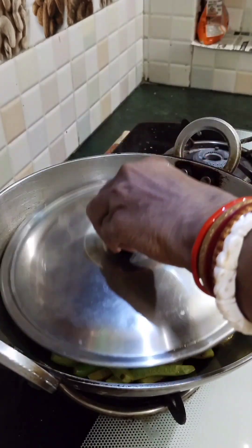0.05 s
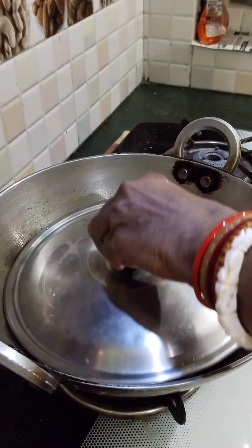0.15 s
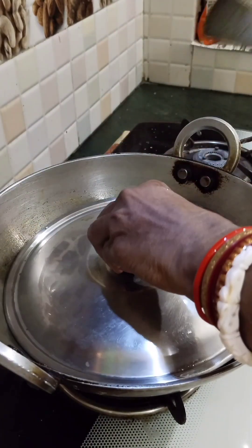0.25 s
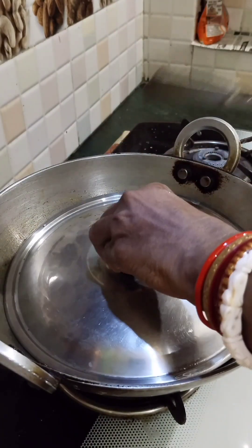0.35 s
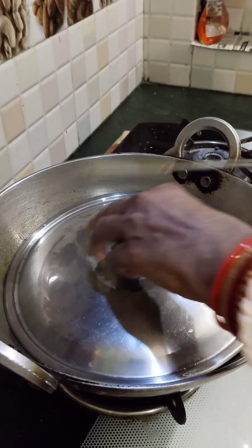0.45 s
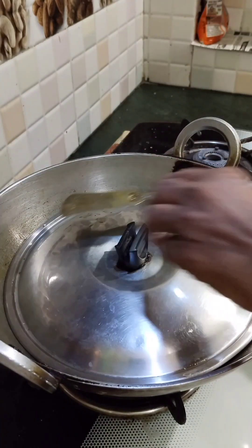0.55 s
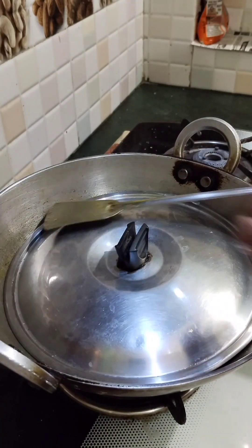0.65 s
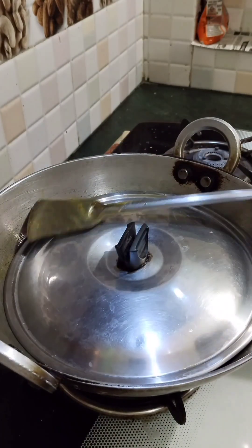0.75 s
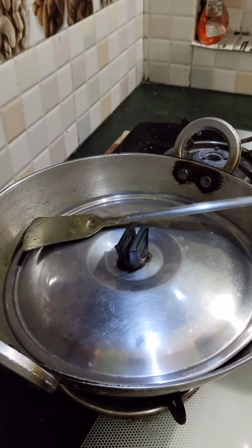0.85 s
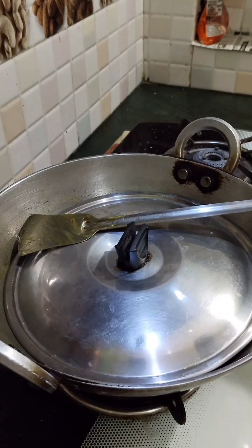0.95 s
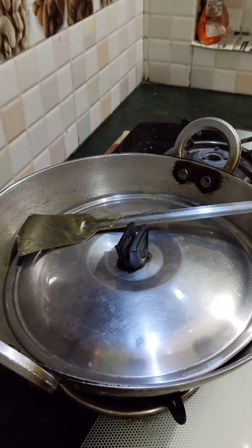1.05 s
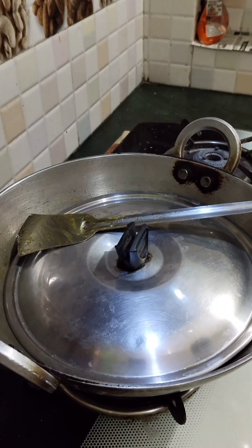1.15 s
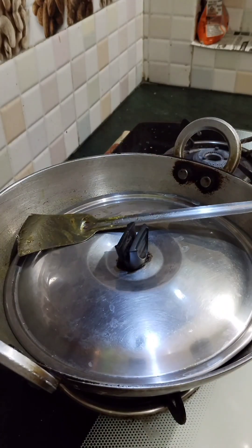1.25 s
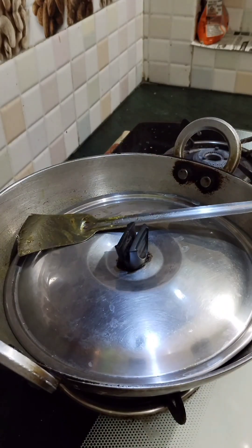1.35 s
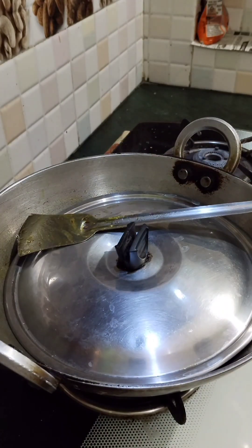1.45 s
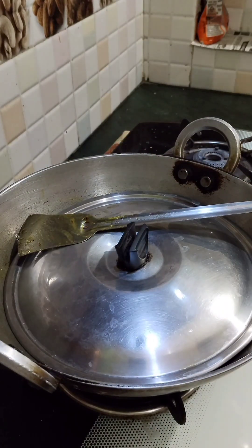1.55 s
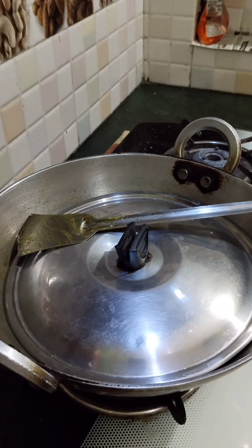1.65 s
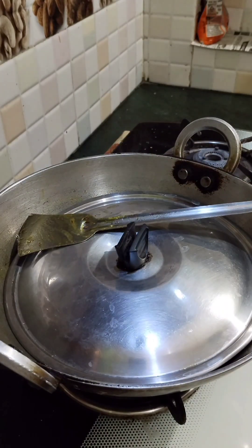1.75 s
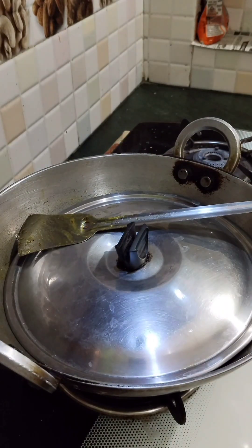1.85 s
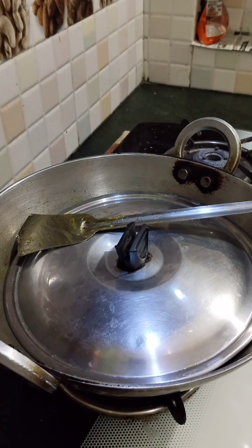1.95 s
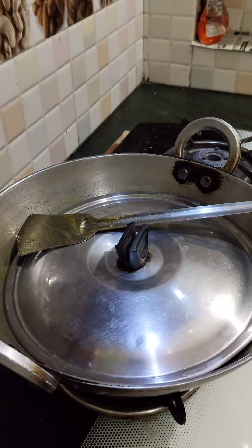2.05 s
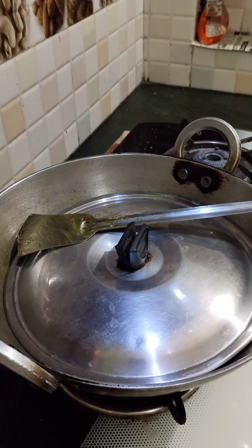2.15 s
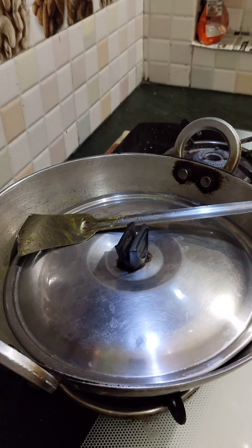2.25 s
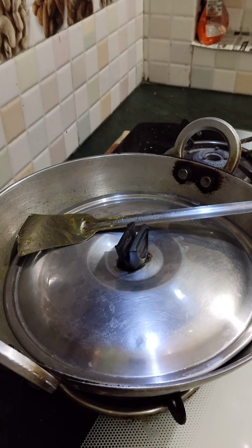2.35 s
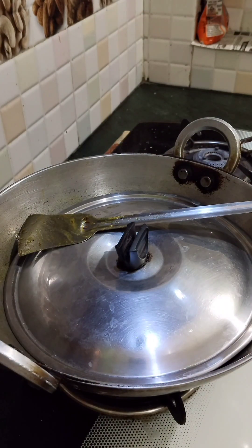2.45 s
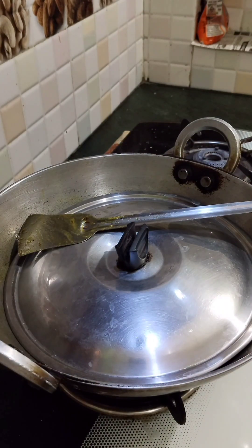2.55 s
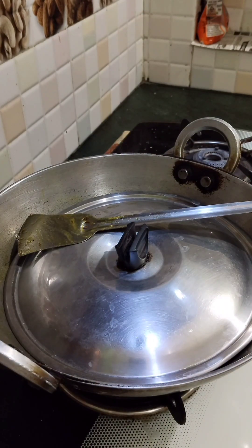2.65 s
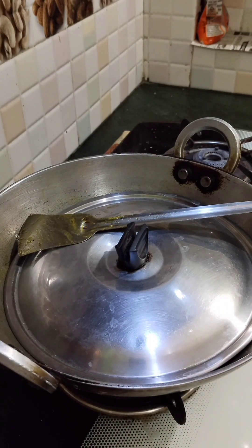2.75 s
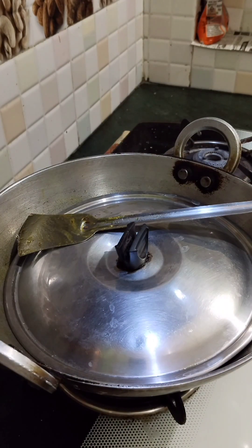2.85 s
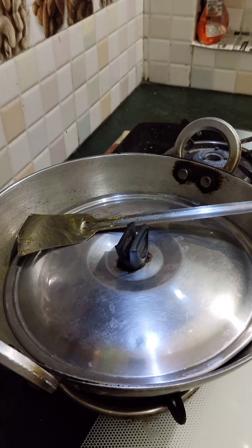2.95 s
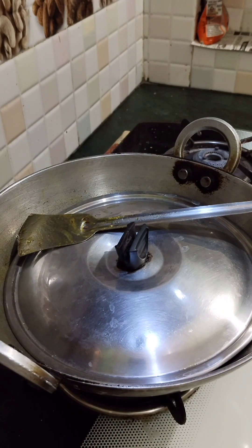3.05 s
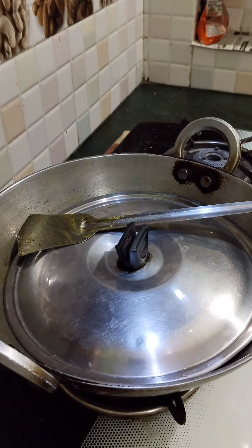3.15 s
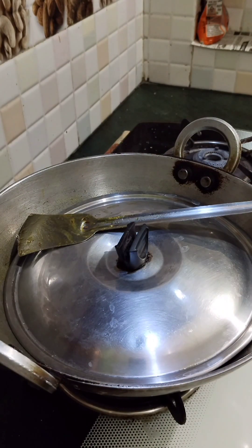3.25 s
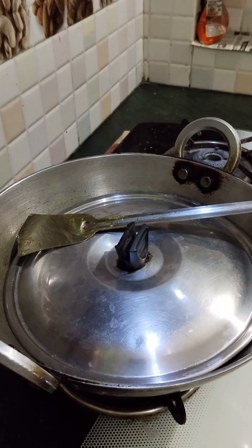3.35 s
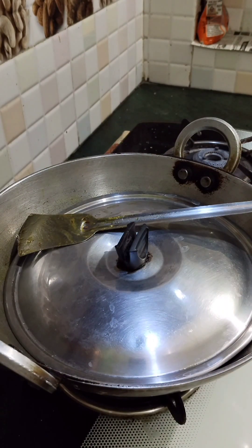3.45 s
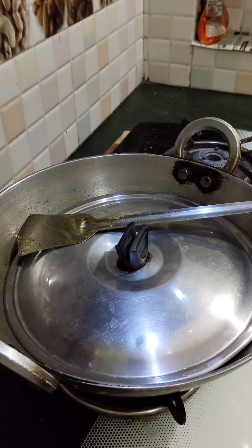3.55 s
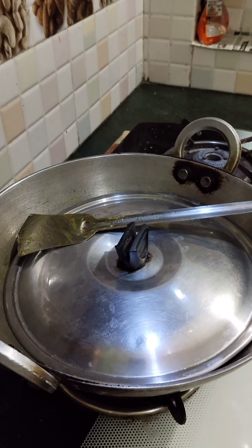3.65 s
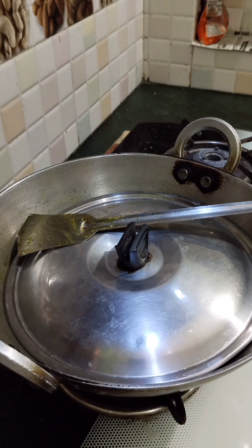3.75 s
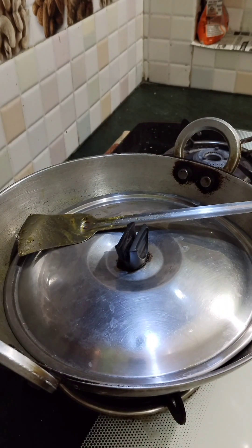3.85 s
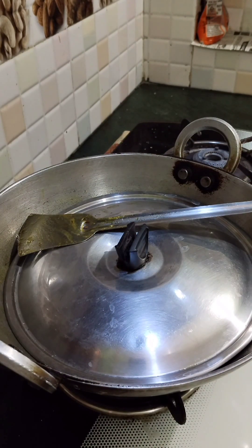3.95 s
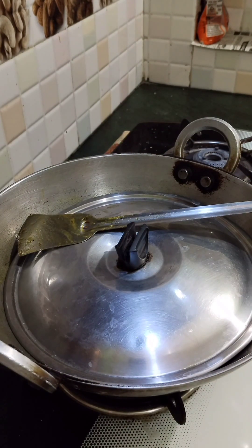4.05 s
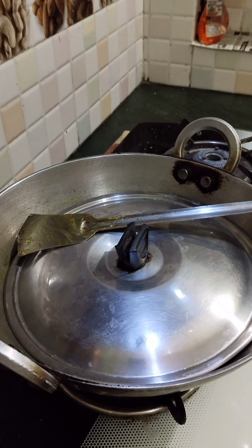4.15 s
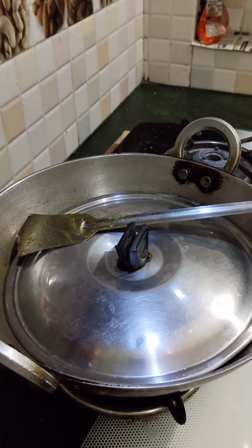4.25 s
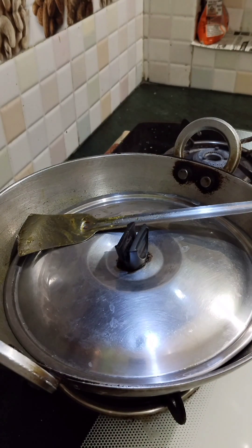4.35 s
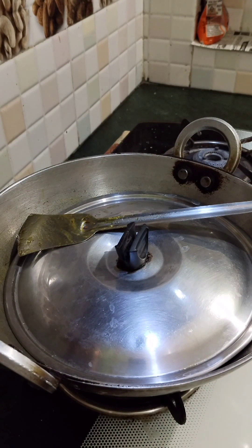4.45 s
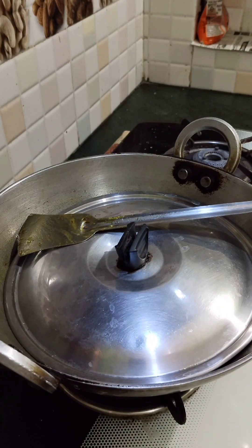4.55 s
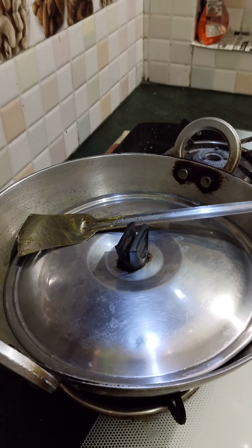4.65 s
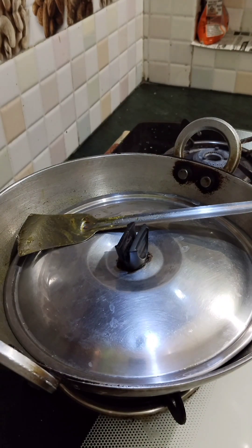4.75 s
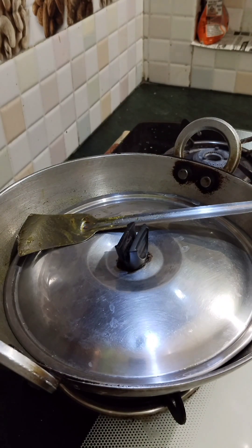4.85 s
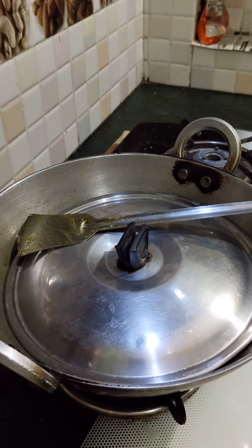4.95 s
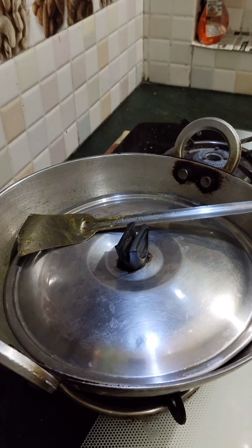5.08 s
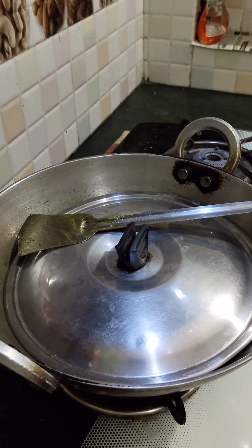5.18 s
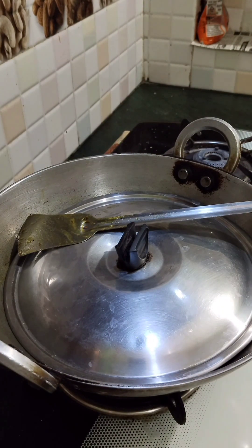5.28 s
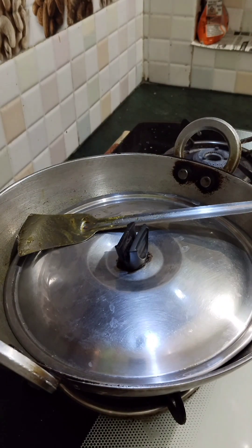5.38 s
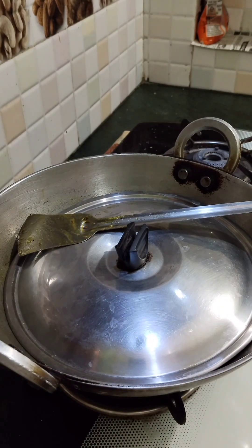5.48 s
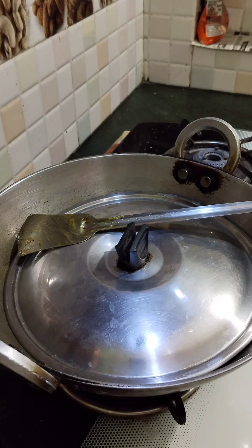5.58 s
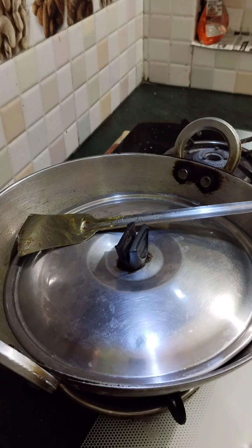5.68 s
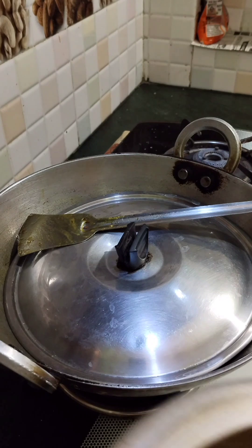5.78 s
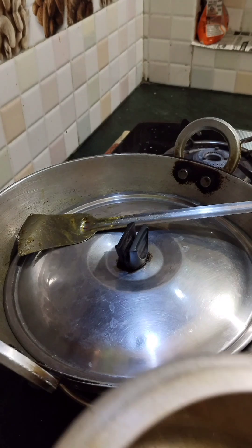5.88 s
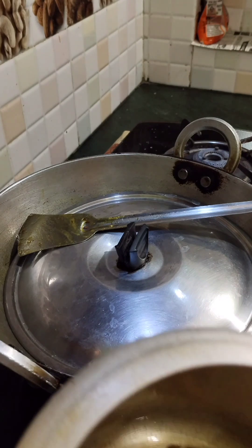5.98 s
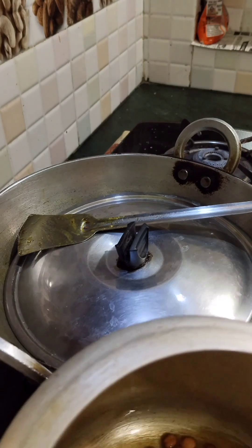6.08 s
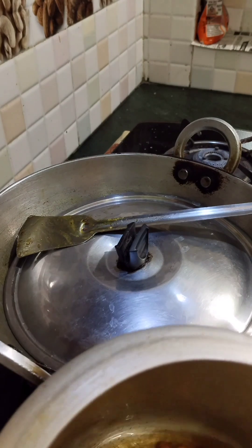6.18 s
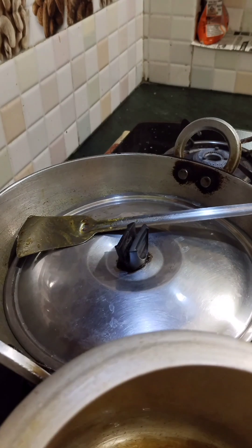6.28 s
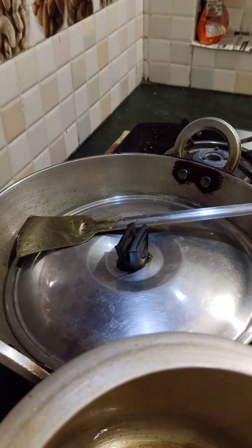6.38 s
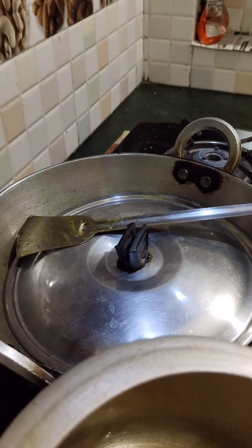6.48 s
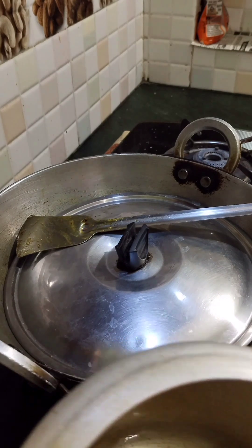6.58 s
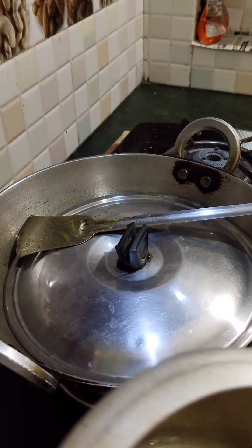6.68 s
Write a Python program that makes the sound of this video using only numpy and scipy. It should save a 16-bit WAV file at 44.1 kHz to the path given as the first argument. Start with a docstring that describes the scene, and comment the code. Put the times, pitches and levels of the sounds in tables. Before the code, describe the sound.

A metal lid clanks onto a sizzling pan, a spatula clatters on top, then steel pots knock sharply in a small tiled kitchen.

```python
"""Vegetables fry in a steel pan in a small tiled kitchen: hiss and bubble bursts as coloured noise, with short
ticks and pops. A lid is set down and muffles the sizzle, a spatula is laid on it, and steel pots are knocked and
shifted nearby; each blow is a noise clatter plus ringing modes, reflected by the tiles. A thin whistle, hums and
the burner's rumble lie around it. Two spaced microphones listen from close by."""
import sys
import numpy as np
from scipy import signal
from scipy.fft import rfft, irfft
from scipy.io import wavfile
from scipy.ndimage import uniform_filter1d

SR = 44100
rng = np.random.default_rng(int(sys.argv[2]) if len(sys.argv) > 2 else 0)


def materialize(psi):
    """Save the field psi as 16-bit PCM at rate SR to the path in sys.argv[1].

    A 1-D psi becomes a single channel; in a 2-D psi each row is a channel.
    """
    bounded = np.clip(np.atleast_2d(psi).T, -1, 1)
    quanta = np.round(bounded * 32767).astype(np.int16)
    wavfile.write(sys.argv[1], SR, quanta)


N = 296352

# colour of the frying heard through lid and pan: frequency_hz [Hz], relative_level_db [dB]
FRYING_COLOUR = [(350, -55), (600, -26), (699, -8), (836, -14.5), (1090, -8.5), (1290, -2.5), (1640, -11),
                 (2050, 2.5), (2290, -1.5), (3240, 1.5), (4270, -7), (6840, -10.5), (8530, -8),
                 (15200, -22.5), (16300, -24)]


def gain_of(db):
    """Turns decibels into amplitude."""
    return 10 ** (np.asarray(db) / 20)


def evened(x):
    """Scales to rms 1 over all channels together."""
    return x / np.sqrt(np.mean(x ** 2) + 1e-20)


def read(points, hz):
    """Reads a (Hz, value) table on a log-frequency axis."""
    f, value = np.transpose(points)
    return np.interp(np.log(hz + 1), np.log(f + 1), value)


def along(rows, column):
    """Reads one column of a time table at every sample."""
    rows = np.array(rows)
    return np.interp(np.arange(N) / SR, rows[:, 0], rows[:, column])


def colour(x, db_of_hz):
    """Filters along the last axis by a gain in dB over frequency."""
    size = x.shape[-1]
    gain = gain_of(db_of_hz(np.fft.rfftfreq(size, 1 / SR)))
    return irfft(rfft(x) * gain, size)


def add(mix, s, sound):
    """Mixes a sound in at time s, cut off at the end of the mix."""
    part = mix[..., round(s * SR):][..., :sound.shape[-1]]
    part += sound[..., :part.shape[-1]]


def diffuse(x):
    """Blends two unrelated channels so that the bass is alike at both microphones."""
    # left-right likeness of diffuse sound: frequency_hz [Hz], correlation [-1 to 1]
    likeness = [(60, 0.88), (180, 0.99), (550, 0.058), (1650, -0.01), (4970, -0.094), (15000, 0.0041)]
    size = x.shape[1]
    a, b = rfft(x)
    same = np.clip(read(likeness, np.fft.rfftfreq(size, 1 / SR)), -1, 1)
    right = same * a + np.sqrt(1 - same ** 2) * b
    return irfft(np.array([a, right]), size)


def sizzle(bursts_per_s=1500, spread_db=2.6, bursts_db=-5.5):
    """Hiss and bursting steam bubbles heard through the lid and pan; the lid shuts off some fizz."""
    # loud open pan, muffled by the lid, calming in uneven swells: time_s [s], body_level_db [dB]
    sizzle_level = [(0, -37), (.15, -36), (.36, -40.5), (1.2, -42.5), (2.5, -41.5), (3.5, -40.5),
                    (3.75, -44), (4.1, -43.5), (5.1, -46.5), (5.38, -46.5), (5.46, -45), (5.8, -46.5),
                    (6.08, -45), (6.45, -47.5), (6.72, -46)]
    fizz_db, fizz_open_db, lid_shut_s = -2.5, 2, .12  # fizz re the body, extra at the start, its fade time
    strengths = gain_of(spread_db * np.minimum(rng.exponential(1, N), 5))
    bubbles = strengths * (rng.random(N) < bursts_per_s / SR)
    t = np.arange(600) / SR
    bursts = []
    for _ in range(2):
        burst = rng.standard_normal(600) * np.exp(-t / .004)
        bursts.append(signal.oaconvolve(bubbles, burst)[:N])
    swell = evened(uniform_filter1d(uniform_filter1d(rng.standard_normal(N), 1500), 1500))
    hiss = rng.standard_normal((2, N)) * gain_of(.7 * swell)
    hiss += gain_of(bursts_db) * evened(np.array(bursts))
    hiss = colour(diffuse(hiss), lambda f: read(FRYING_COLOUR, f))
    fizz = colour(hiss, lambda f: -80. * (f < 4500))  # the part above 4.5 kHz
    body = evened(hiss - fizz)
    fizz_gain = gain_of(fizz_db + fizz_open_db * np.exp(-np.arange(N) / SR / lid_shut_s))
    return gain_of(along(sizzle_level, column=1)) * (body + fizz_gain * evened(fizz))


def hums():
    """Narrow bands of noise: low steady hums and two lid modes between 430 and 500 Hz."""
    # steady hums in the kitchen and the lid: centre_hz [Hz], width_hz [Hz], level_db [dB]
    hum_bands = [(49.5, 2.2, -66.5), (76, 0.63, -63.5), (97.8, 1.5, -71), (145.8, 0.69, -66.5),
                 (436.4, 6.2, -67), (492, 7.8, -63)]
    out = np.zeros((2, N))
    for hz, width, db in hum_bands:
        line = colour(rng.standard_normal((2, N)), lambda f: -10 * np.log10(1 + (2 * (f - hz) / width) ** 4))
        out += gain_of(db) * evened(diffuse(line))
    return out


def burner():
    """Low rumble of burner and kitchen: bass-heavy noise that slowly rises and falls."""
    # colour of the rumble: frequency_hz [Hz], relative_level_db [dB]
    rumble_colour = [(15, -49), (25, -26), (59, -9), (81, -0.5), (151, -9), (189, 1), (204, -11.5),
                     (244, -8.5), (340, -2), (372, -7), (425, 3.5), (494, -2.5), (583, -2.5), (697, -9.5),
                     (900, -21), (1170, -61), (1980, -120)]
    # its loudness: time_s [s], level_db [dB]
    rumble_level = [(0, -53), (1.3, -58), (1.9, -57.5), (2.7, -49.5), (3.7, -58.5), (4.4, -60.5),
                    (6.0, -57), (6.72, -54.5)]
    rumble = colour(diffuse(rng.standard_normal((2, N))), lambda f: read(rumble_colour, f))
    return gain_of(along(rumble_level, column=1)) * evened(rumble)


def vessel(blows, modes, body, lag_s, pan_db, wet_db, split, grip_t60, length, contact, belly_db, size=2 ** 14):
    """Each blow rattles dense modes (clatter) and rings clear ones; returns left, right and the walls' share.

    pan_db is left minus right, split a fraction of pitch, grip_t60 and contact are in s,
    length scales the ring times, belly_db lifts 600 Hz, size is in samples.
    """
    out, t, f = np.zeros((2, N)), np.arange(size) / SR, np.fft.rfftfreq(size, 1 / SR)
    hz, db, t60 = np.transpose(modes)[:, :, None]
    twin = hz * (1 + split * rng.uniform(0.93, 0.95, hz.shape))  # dents split each mode into a beating pair
    turn, twin_turn = np.exp(2j * np.pi * hz * t), np.exp(2j * np.pi * twin * t)
    humps = gain_of(db) ** 2 / (1 + ((f - hz) / (20 + .012 * hz)) ** 2)
    rattled_db = read(body, f) + 10 * np.log10(1 + 30 * humps.sum(0))  # modes show as humps in the clatter
    next_s = [row[0] for row in blows[1:]] + [N / SR]
    for (s, peak_db, low_db, mid_db, high_db, clatter_t60, ring_db), then in zip(blows, next_s):
        # which modes the blow reaches, re 2800 Hz
        reach = [(200, low_db), (600, (low_db + mid_db) / 2 + belly_db), (1200, mid_db),
                 (2800, 0), (9000, high_db)]
        clatter = rng.standard_normal((2, size))
        clatter[1] = .5 * clatter[0] + 1.86 * clatter[1]  # each microphone faces other parts of the metal
        clatter = rfft(diffuse(clatter)) * gain_of(rattled_db)
        clatter = irfft(clatter * gain_of(read(reach, f))) / irfft(clatter).std()
        bounces = evened(uniform_filter1d(uniform_filter1d(rng.standard_normal(size), 120), 120))
        tail = gain_of(2.5 * bounces - 60 * t / clatter_t60)
        first_crack = .8 * np.exp(-t / .003)
        clatter *= tail + first_crack

        phase = np.exp(2j * np.pi * rng.random((len(modes), 1)))  # both twins start together
        decay_s = np.clip(t60, .05, 1.2) * length
        ring = gain_of(db + read(reach, hz) - 60 * t / decay_s)
        ring = (ring * (phase * (turn + .5 * twin_turn)).imag).sum(0)
        ring *= gain_of(ring_db - 60 * np.maximum(t + s - then, 0) / grip_t60)  # the next touch damps it

        onset = 1 - np.exp(-t / contact)
        edges = onset * np.minimum(10 * (1 - t / t[-1]), 1)  # fades over the last tenth
        add(out, s, gain_of(peak_db) * edges * (clatter + ring) / 2.22)  # rms to peak
    out[0] = np.roll(out[0], round(lag_s * SR))  # the left microphone is farther away
    direct = out * gain_of(pan_db * np.array([[.5], [-.5]]))
    return np.vstack([direct, gain_of(wet_db) * out[1]])


def lid():
    """The lid is set down: clatter over short, low modes."""
    # blows: start_s [s], peak_db [dB], low_db, mid_db, high_db [dB], clatter_t60_s [s], ring_db [dB]
    blows = [(.0835, -22, 2, -0.5, 6, 0.16, 1.5), (.0989, -11.5, -20, -8.3, 0.5, 0.14, -5.5),
             (.1384, -19, -33, -6.5, -16, 0.31, -19), (.2239, -21, 1, 2.5, -6, 0.2, -5.5),
             (.2844, -31, 6.5, -3, -10, .12, -2), (.7871, -13, -3.7, -7, 2, .12, -4.5),
             (.9085, -15, -3, -6, -11, 0.39, -12.5), (.9315, -9, -5, -11, 3, 0.069, -4.5),
             (.9598, -31, 0, -1, -8, 0.28, -12), (.9884, -26.5, -11, -12, -14, 0.21, 1)]
    # clear modes: pitch_hz [Hz], level_db [dB], t60_s [s, before length]
    modes = [(175, -13, .2), (431, -5, .26), (484, 0, .3), (721, -13, .25), (880, 3, .16), (964, -9, .18),
             (1028, -8, .16), (1244, -.5, .26), (1324, -7, .3), (1550, -13, .3), (1863, -8, .3),
             (2293, -13, .3), (2606, -13, .3), (2891, -11, .24), (3332, -14, .3), (3801, -14, .3),
             (4926, -14, .3)]
    # dense upper modes: frequency_hz [Hz], relative_level_db [dB]
    body = [(47, -49), (80, -16), (323, -21), (493, 1), (896, -14.5), (958, -45), (1220, -1), (1630, -5),
            (1820, -7), (16000, -20)]
    return vessel(blows, modes, body, lag_s=.0001, pan_db=0.6, wet_db=0, split=0.0058, grip_t60=0.7,
                  length=0.51, contact=0.0018, belly_db=6.5)


def spatula():
    """A spatula laid on the lid: its clear modes all lie above 1.5 kHz."""
    # blows: start_s [s], peak_db [dB], low_db, mid_db, high_db [dB], clatter_t60_s [s], ring_db [dB]
    blows = [(.0835, -18, -25, -7, 2, 0.15, -17), (.7876, -7.5, -30, 16, 8.5, 0.07, -10),
             (.8062, -11, -25, -10, -33, .084, 0), (.9151, -25.5, -28, -5, 3.5, 0.34, 3),
             (.9436, -11, -28, -5, -5, 0.19, -4.5), (.9846, -23, -26, -7, -15, .11, -4)]
    # clear modes: pitch_hz [Hz], level_db [dB], t60_s [s, before length]
    modes = [(1540, -12, .2), (3022, -1, .2), (3488, -9, .2), (4382, -11, .12), (4694, -11, .3),
             (5771, -5, .16), (6045, -6, .25), (6345, -8, .3), (6831, -9, .15), (7337, -12, .3),
             (7677, -6, .3), (7803, -6, .25), (8193, -7, .3), (8592, -9, .27), (8856, -11, .3)]
    # dense upper modes: frequency_hz [Hz], relative_level_db [dB]
    body = [(47, -57), (80, -27), (441, -19), (588, -16), (1310, -16.5), (2540, -8.5), (2970, -13.5),
            (3540, -8), (7700, -10), (16000, -21)]
    return vessel(blows, modes, body, lag_s=.0001, pan_db=7.0, wet_db=-9.5, split=0.0083, grip_t60=0.4,
                  length=0.62, contact=0.0019, belly_db=0.0)


def ticks_and_pops():
    """Short ticks and pops over the frying: a sharp tick at 0.378 s, then larger spits, all as noise bursts."""
    # ticks and pops: start_s [s], level_db [dB], left_minus_right_db [dB]
    pops = [(0.378, -15.5, -1), (1.3624, -26.5, 0), (1.7403, -30, -4), (2.2925, -33, -5), (2.435, -25, -2),
            (2.5984, -28, -2), (5.2973, -27, -3), (5.4306, -29.5, -3), (5.7317, -32.5, -6),
            (5.8206, -34, 4), (6.4774, -30, -2)]
    out, t = np.zeros((2, N)), np.arange(2048) / SR
    for s, db, pan_db in pops:
        pop = evened(colour(rng.standard_normal((2, len(t))), lambda f: read(FRYING_COLOUR, f)))
        pop *= np.exp(-t / .0015) + .3 * np.exp(-t / .012)  # a sharp and a slower decay
        add(out, s, gain_of(db + pan_db * np.array([[.5], [-.5]])) * pop / 2)
    return out


def whistle():
    """A short thin whistle: one sine that swells and fades, alike at both microphones."""
    # one row: centre_s [s], half_length_s [s], pitch_hz [Hz], level_db [dB]
    centre, half, hz, db = (2.03, .045, 3053, -43)
    t = np.arange(N) / SR
    return gain_of(db) * np.exp(-((t - centre) / half) ** 2) * np.sin(2 * np.pi * hz * t)


def pan():
    """A pan knocked and shifted: many close blows on widely split modes."""
    # blows: start_s [s], peak_db [dB], low_db, mid_db, high_db [dB], clatter_t60_s [s], ring_db [dB]
    blows = [(2.6922, -36.5, 20.5, -59, 16, 0.74, -10.5), (2.7404, -21.5, -13.5, 0.5, 19.5, 0.19, -8.5),
             (3.0633, -10, -26.5, -4, 10, 0.2, -5), (3.1087, -25, -1.5, 8, -6, 0.24, -8.5),
             (3.2034, -7, -9, -5.7, 5.5, 0.23, -16.5), (3.2397, -24, -3, -3, -8, 0.17, -11),
             (3.2935, -11, -24, 5, -8, .05, -12), (3.3075, -6, -16.5, 3.5, 2, 0.25, -22),
             (3.3215, -6, -26, 10.5, 11.5, 0.076, -40), (3.3402, -5, -25, -3, 5, 0.095, -42),
             (3.5793, -22, -27, -4, 12.5, 0.15, -21), (4.029, -24.5, -41, -12, 12.5, 0.065, -22),
             (4.1886, -25.5, -25, -16, 9.5, 0.1, -20)]
    # clear modes: pitch_hz [Hz], level_db [dB], t60_s [s, before length]
    modes = [(157, 4.5, 0.21), (200, -13, 0.18), (278.3, 2, 0.3), (344, 5, 0.65), (864, -7, .8),
             (1038, -1.5, 0.36), (1040, -1, 0.093), (1010, -20, 0.16), (1157, -5, 0.054),
             (1300, -5.5, 0.14), (2360, -3.5, 0.062), (2720, -0.5, 0.34), (2940, -24, 0.22),
             (3870, -5, 0.18), (4260, -6, 0.074), (5700, -15, 0.23), (8300, -4.5, 0.09)]
    # dense upper modes: frequency_hz [Hz], relative_level_db [dB]
    body = [(47, -55), (80, -37), (237, -7.5), (331, -2), (615, -9), (1050, -9), (1860, -12), (2600, -10.5),
            (3030, -11), (8230, -19), (16000, -35)]
    return vessel(blows, modes, body, lag_s=.00015, pan_db=3.5, wet_db=-3.5, split=0.016, grip_t60=0.69,
                  length=.7, contact=.002, belly_db=-3.0)


def pot():
    """A pot knocked: a long mode near 1 kHz, quickly damped by the next touch."""
    # blows: start_s [s], peak_db [dB], low_db, mid_db, high_db [dB], clatter_t60_s [s], ring_db [dB]
    blows = [(2.741, -24, -1.5, -14, 9, .18, -12), (2.8438, -12, -24, 9, -2, .07, -6),
             (3.0618, -9.5, -12, -13, -1.5, .2, -18), (3.2586, -21, -12, -4, -17, .16, -5),
             (3.8002, -1, -10, -4, -4, .16, -13), (3.8145, -7, -20, -6, -2, .14, -16),
             (3.8284, -9, -30, -6, 2.2, .2, -11), (3.8629, -22, -42, 11, -19, .1, -5)]
    # clear modes: pitch_hz [Hz], level_db [dB], t60_s [s, before length]
    modes = [(435, -9, .15), (1038, -1, 1.0), (1180, -10, .2), (2652, -4, .27), (5674, -2, .16),
             (1340, -11, .3), (1647, -8, .15), (2458, -11, .2), (2923, -12, .4), (3420, -10, .25),
             (3944, -11, .25), (4167, -12, .22), (5076, -12, .17), (5615, -12, .25), (6845, -12, .29),
             (7090, -13, .25), (7784, -13, .17), (8180, -12, .25), (8317, -14, .3), (9362, -19, .23)]
    # dense upper modes: frequency_hz [Hz], relative_level_db [dB]
    body = [(47, -67), (80, -13), (451, -17.5), (643, -19.5), (1020, -7.5), (1900, -8.5), (2720, -6.5),
            (3100, -9), (8410, -13.5), (15000, -22), (16000, -68)]
    return vessel(blows, modes, body, lag_s=.0004, pan_db=1.2, wet_db=-7, split=.0009, grip_t60=.14,
                  length=1.0, contact=.0024, belly_db=11.0, size=2 ** 15)


def bowl():
    """A bowl knocked: short modes spread from low to high, only lightly damped by the next touch."""
    # blows: start_s [s], peak_db [dB], low_db, mid_db, high_db [dB], clatter_t60_s [s], ring_db [dB]
    blows = [(4.5140, -12.5, -28, 9, .6, .22, -14), (4.5343, -30, -11, 3, -7, .25, -6),
             (4.5594, -16, -14, -2, 1.5, .3, -19), (4.579, -2.2, -8.5, 1.1, -2.2, .19, -9),
             (4.5989, -15, -6, 3, -9, .15, -6), (4.698, -27.5, -7, 3, -3, .33, -23)]
    # clear modes: pitch_hz [Hz], level_db [dB], t60_s [s, before length]
    modes = [(178, -4, .6), (277, -5, .25), (678, 0, .4), (1880, -3, .29), (3925, -6, .4), (5345, -6, .38),
             (8168, -6, .25), (1130, -9, .2), (1270, -7, .15), (1450, -8, .15), (2463, -11, .2),
             (2514, -11, .2), (3230, -7, .3), (3628, -7, .25), (4409, -7, .18), (5620, -8, .3),
             (6848, -9, .24), (7235, -8, .17), (8624, -12, .29), (9701, -14, .29)]
    # dense upper modes: frequency_hz [Hz], relative_level_db [dB]
    body = [(47, -51), (80, -25.5), (563, -3.5), (657, -11), (858, -16), (1900, -19), (2270, -21.5),
            (2490, -13), (8410, -15), (15000, -22), (16000, -44)]
    return vessel(blows, modes, body, lag_s=0.00012, pan_db=4.0, wet_db=-2.5, split=0.0056, grip_t60=1.7,
                  length=0.41, contact=0.0026, belly_db=-0.3)


def tray():
    """A tray knocked: four close blows over one long low mode and short higher ones."""
    # blows: start_s [s], peak_db [dB], low_db, mid_db, high_db [dB], clatter_t60_s [s], ring_db [dB]
    blows = [(4.7505, -5, -17, 2, 5.5, 0.1, -17), (4.769, -10.5, -7.5, -8, 1.4, 0.26, -9),
             (4.8245, -6, -19, -5, 5.1, .13, -19), (4.849, -15, -15, -2.5, 1.7, 0.19, -20)]
    # clear modes: pitch_hz [Hz], level_db [dB], t60_s [s, before length]
    modes = [(183.8, -5, 0.87), (278, -15, 0.31), (656, -16, .2), (1090, -16, 0.18), (2506, -1.5, 0.16),
             (2750, -4.5, .3), (3260, -6, .3), (3680, -14, .2), (3950, -21, 0.39), (4490, -18, .3),
             (5800, -24, 0.23), (5965, -26, .2), (8300, -6, 0.25), (8700, -18, 0.23)]
    # dense upper modes: frequency_hz [Hz], relative_level_db [dB]
    body = [(47, -60), (80, -20), (178, 1), (212, -18), (271, -5), (515, -7.5), (2130, -18.5), (2780, -7),
            (4940, -12), (8230, -16), (16000, -27.5)]
    return vessel(blows, modes, body, lag_s=0.00018, pan_db=5.0, wet_db=-4.5, split=0.0084, grip_t60=1.0,
                  length=0.98, contact=0.0017, belly_db=5.2)


def kettle():
    """A kettle knocked near the end: short modes, many of them below 800 Hz."""
    # blows: start_s [s], peak_db [dB], low_db, mid_db, high_db [dB], clatter_t60_s [s], ring_db [dB]
    blows = [(6.148, -8.5, -10, 3.8, 14.5, 0.14, -12), (6.171, -22, -6, 3.6, 13, 0.1, 4),
             (6.22, -34, 3.5, 1.7, 19, 0.54, 6.5), (6.314, -28.5, -2.5, 9.2, -5, 0.067, -4.5)]
    # clear modes: pitch_hz [Hz], level_db [dB], t60_s [s, before length]
    modes = [(142, -9, .4), (403, -5, .35), (435, -3, .25), (478, -3, .2), (565, -9, .2), (760, -7, .12),
             (1260, -6, .25), (1890, -4, .3), (2540, -10, .3), (2790, -6, .25), (3620, -6, .1),
             (4630, -9, .15), (6045, -14, .2), (7700, -16, .2)]
    # dense upper modes: frequency_hz [Hz], relative_level_db [dB]
    body = [(47, -52), (80, -36), (139, -32), (232, -7), (404, -4), (980, -11), (1250, -11), (2780, -13),
            (13100, -41), (15000, -45), (16000, -65)]
    return vessel(blows, modes, body, lag_s=0.00031, pan_db=5.5, wet_db=-3.0, split=0.0066, grip_t60=1.05,
                  length=0.4, contact=0.0019, belly_db=0.5)


def kitchen(x):
    """Sparse reflections of random sign from tiled walls, each band dying at its own speed."""
    # reverberation of the room: frequency_hz [Hz], t60_s [s]
    room_t60 = [(100, 0.63), (500, 0.26), (2000, 0.28), (6000, 0.26), (15000, 0.26)]
    places = np.arange(200, 20000, 20)  # samples; one reflection in each slot of 20
    taps = np.zeros((2, 20480))
    at = places + rng.integers(0, 20, (2, len(places)))
    np.put_along_axis(taps, at, rng.choice([-1., 1.], at.shape), 1)
    taps = diffuse(taps)
    hz, t, z = signal.stft(taps, SR, nperseg=256)
    decay = gain_of(-60 * t / read(room_t60, hz)[:, None])
    tail = signal.istft(z * decay, SR, nperseg=256)[1]
    return signal.fftconvolve(x[None], tail / np.linalg.norm(tail[0]), axes=1)[:, :N]


def scene():
    """Sums all sources at the two microphones; only the struck metal is sent to the walls."""
    metal = lid() + spatula() + pan() + pot() + bowl() + tray() + kettle()
    frying = sizzle() + ticks_and_pops() + whistle()
    return frying + hums() + burner() + metal[:2] + kitchen(metal[2])


def record(dry):
    """The microphones drop the deepest bass, the loudest peaks clip; then the band limit."""
    edge_hz = 16300
    heard = signal.sosfilt(signal.butter(2, 40, "high", fs=SR, output="sos"), dry)
    edge = signal.firwin(255, edge_hz, window=("kaiser", 9), fs=SR)
    limited = signal.oaconvolve(np.clip(heard, -1, 1), edge[None], "same")
    return np.clip(limited, -1, 1)


dry = scene()
out = record(dry)
materialize(out)
```